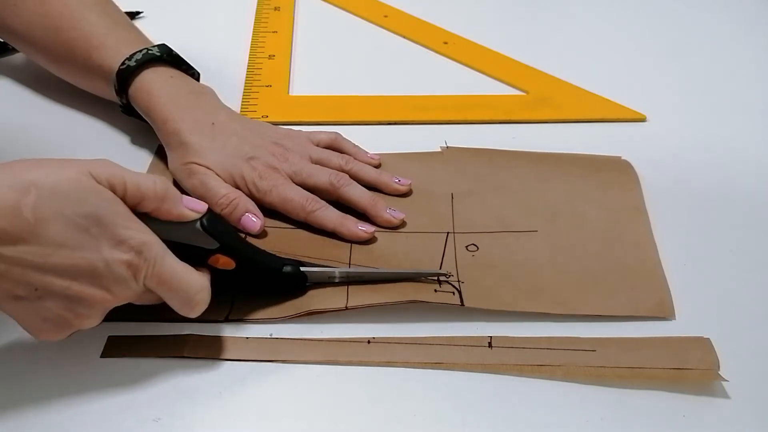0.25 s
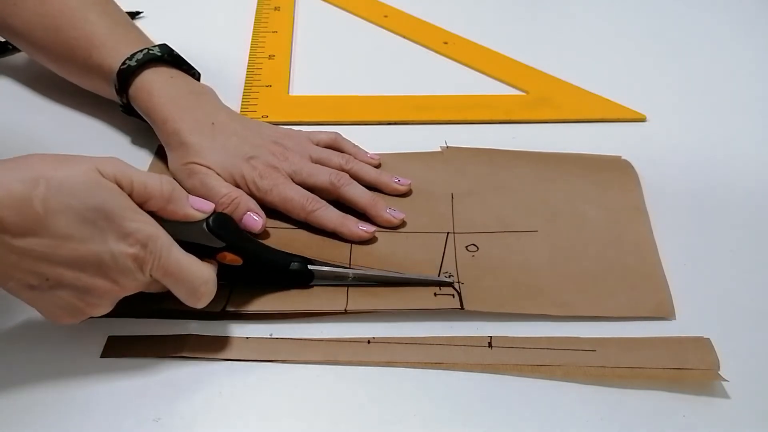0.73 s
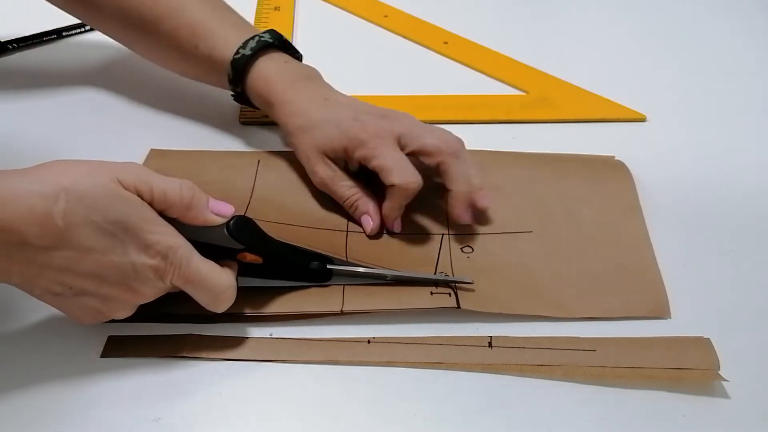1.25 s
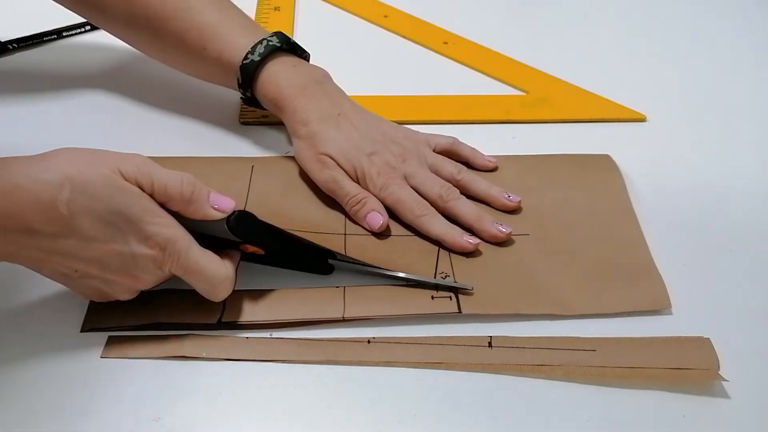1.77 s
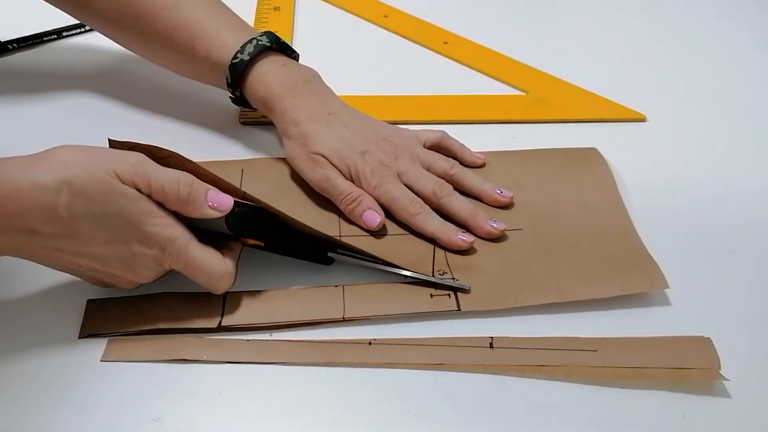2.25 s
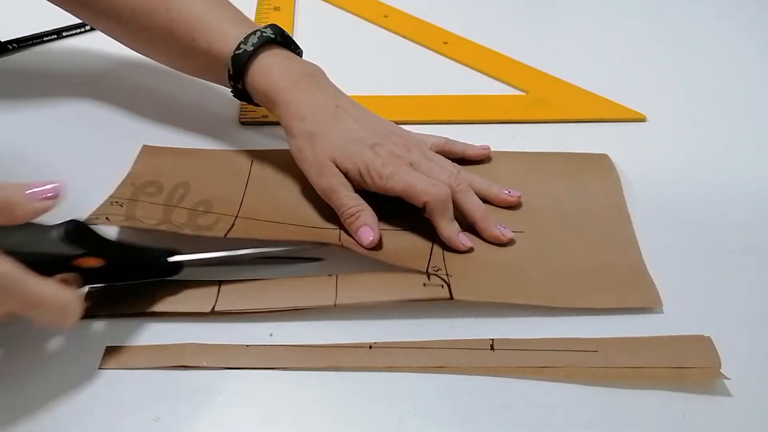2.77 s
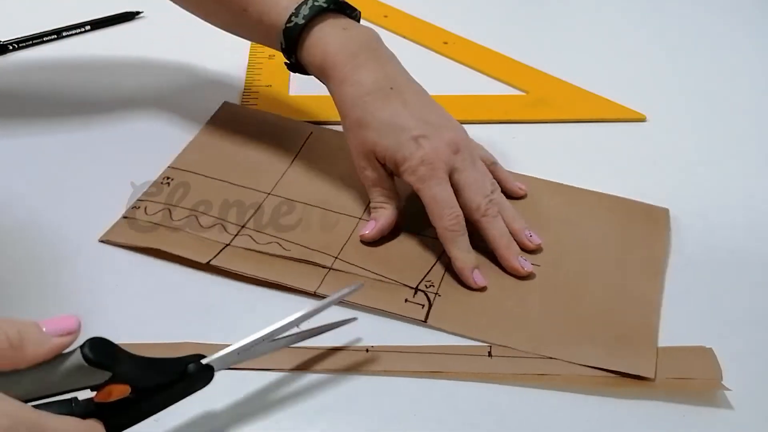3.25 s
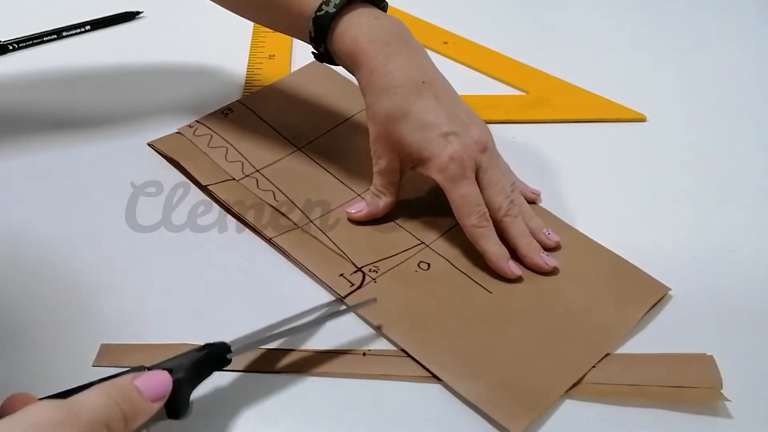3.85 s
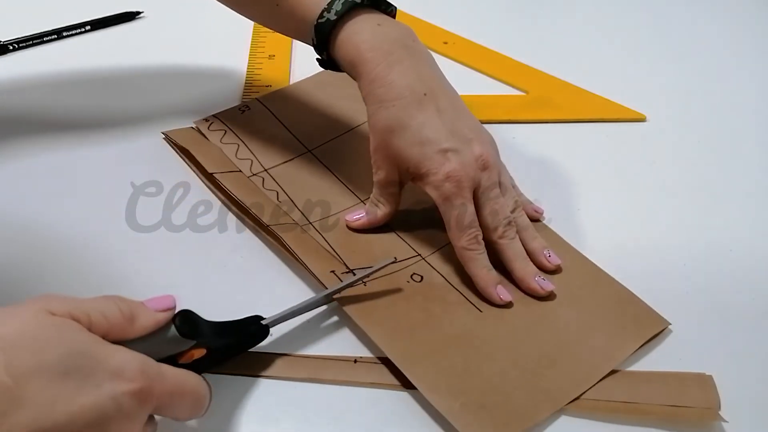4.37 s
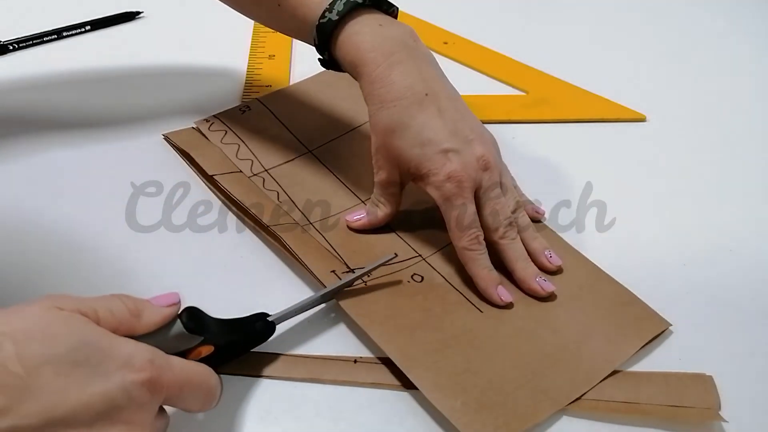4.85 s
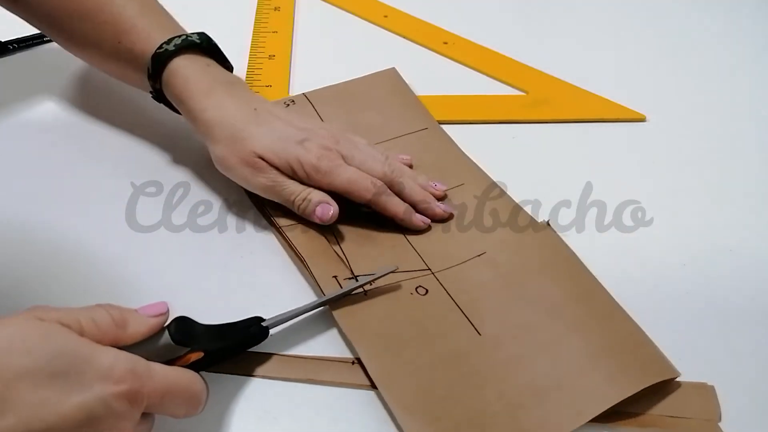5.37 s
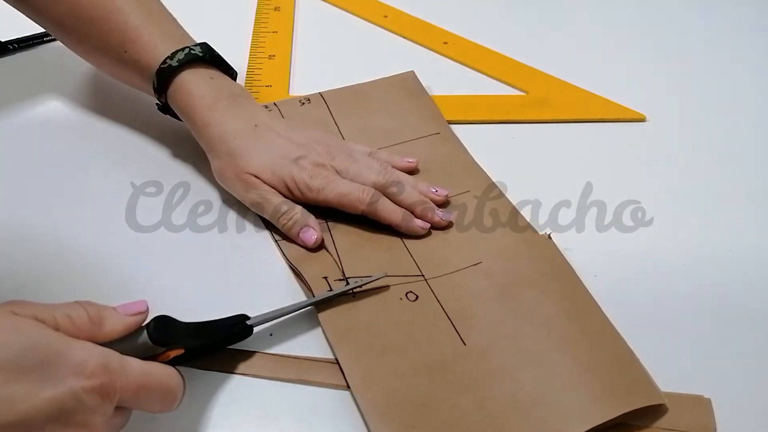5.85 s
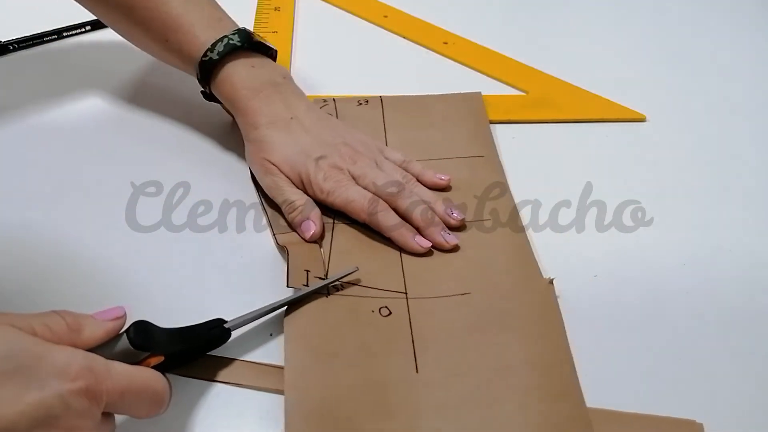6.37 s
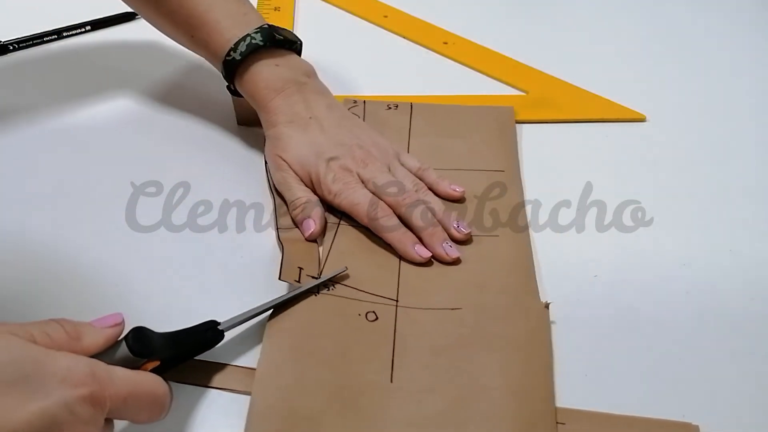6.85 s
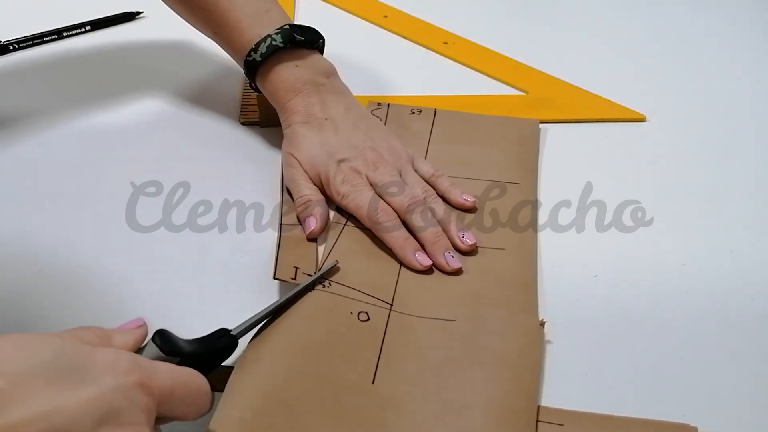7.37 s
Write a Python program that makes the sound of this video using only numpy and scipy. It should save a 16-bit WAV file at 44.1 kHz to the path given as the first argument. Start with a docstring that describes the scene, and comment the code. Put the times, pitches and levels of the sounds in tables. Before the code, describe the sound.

Heavy paper is cut on a table: fibrous, gritty crunches come first, loud and near, with low body and crisp edge. Blades and fingers then tap lightly while the sheet hisses and skin rubs dully. Steel raps the tabletop once with quick rebounds. Near-quiet follows, then a muffled hand thump, thin creaks, another brief cluster of snips and bright paper ticks. Dry small room, close microphone, soft air and rumble.

```python
"""Scissors bite through thick kraft paper on a table, close to the microphone in a small quiet room.
Fibres snap in clumps, the blades knock and strike the table once, and a few short bites follow late.
Hand and sheet rub in random slips, bent paper creaks and ticks through resonances, soft landings thump.
Table and scissors ring in their own modes; wall echoes, still air and a low rumble lie behind."""
import sys
import numpy as np
from scipy import signal
from scipy.io import wavfile
from scipy.ndimage import uniform_filter1d

SR = 44100
rng = np.random.default_rng(int(sys.argv[2]) if len(sys.argv) > 2 else 0)


def master_out(mix):
    """Clip the mix to full scale and print it as 16-bit PCM to the path in sys.argv[1]."""
    frames = np.transpose(np.atleast_2d(mix))
    ceiling = np.clip(frames, -1, 1)
    pcm = np.round(ceiling * 32767).astype(np.int16)
    wavfile.write(sys.argv[1], SR, pcm)


N = 335601

# spectrum of fine paper hiss: hz [Hz], density_db [dB per Hz, relative]
HISS_COLOUR = [(300, -30.5), (1500, -12), (2800, 3.5), (4000, 3.5), (5500, 6.5), (7200, 2)]
BAND_EDGE_HZ = 7520  # upper edge of the recorder's main band


def cutting():
    """Fibres snap in clumps as the blades close, with a low body and a brighter edge."""
    # closing blades: start_s [s], rise_s [s], fall_s [s], force_db [dB, relative], brightness_db [dB]
    strokes = [(0.048, 0.034, .15, -17, -5), (0.512, 0.018, 0.17, -20, -3),
               (0.674, 0.028, 0.049, -20.5, -2.5), (0.88, 0.03, 0.051, -27, -9.5),
               (0.925, 0.026, 0.046, -44, 14), (1.578, 0.021, 0.042, -31.5, -3),
               (1.637, 0.0031, 0.043, -23.5, 2.5), (1.7, 0.0035, 0.1, -32.5, 2.5),
               (1.882, 0.0022, 0.048, -30, 1), (2.129, 0.01, 0.031, -48, 18),
               (2.72, .015, 0.074, -41.5, 16.5)]
    # spectra of the low and the bright part: hz [Hz], density_db [dB per Hz, relative]
    cut_body = [(50, -49), (110, 8), (180, -9.5), (270, 7), (380, -7), (520, 4.5), (700, -4.5),
                (1000, -9.5), (1500, -18.5), (4000, -49)]
    cut_edge = [(300, -34), (900, -10), (1400, 10.5), (2000, 7.5), (2450, 3.5), (3200, -4.5), (4300, -8.5),
                (5500, -9), (7200, -20.5)]
    clumps = unit(uniform_filter1d(rng.standard_normal(N), size=260))
    snaps = unit(stick_slip(per_s=420, uneven=.7, size_db=4) * amp(2.5 * clumps))
    snaps = unit(snaps + 0.3 * grains(per_s=3000, spread_db=0))
    body = amp(-4.0) * colour(snaps, cut_body) * level(strokes)
    edge = amp(-7.5) * colour(snaps, cut_edge) * level(strokes, coloured=True)
    return body + edge


def biting():
    """Bundles of fibres give way under the blades; all ring the sheet at one pitch and crumble alike."""
    # bites: start_s [s], strength_db, body_db, edge_db [dB, relative]
    bites = [(0.064, -10, -21.5, -17.5), (0.073, -9, -26, -20), (0.086, -2.5, -27, -37),
             (0.103, -8.5, 0, -18), (0.128, -2.5, -36, -20.5), (0.149, -10.5, -14, -34.5),
             (0.472, -10, 5, -41), (0.483, -7, 0.5, -38), (0.492, -8.5, -1, -29),
             (0.515, -4.5, -8.5, -14.5), (0.537, -13, -18, -11), (0.545, -5, -3, -23), (0.57, -9, -16, -30),
             (0.572, 2, -26, -24), (0.578, -5, -8, -17), (0.614, -21, -16, -4.5), (0.68, -2.5, -9, -17.5),
             (0.694, -14, -22, -23), (0.716, -10, -8, -14), (6.596, -10, -13.5, -12.5),
             (6.603, -15, 7, -16), (6.646, -9, -16, -15.5)]
    pitch_hz, crumble_s = 566, .0036
    rows = [(s, db, pitch_hz, body, edge) for s, db, body, edge in bites]
    return amp(8.5) * blows(rows, crumble_s, crumble=3, ring_hz=650, clack_db=5, body_db=17.0, edge_db=15)


def knocking():
    """Blades, handles and fingers knock on each other, the sheet and the table."""
    # knocks: start_s [s], strength_db [dB, relative], pitch_hz [Hz], body_db, edge_db [dB, relative]
    knocks = [(0.107, -7, 2330, -5, -10), (0.214, -7, 1805, -9, -11), (0.405, -23, 2000, -37, -5.5),
              (1.009, -24.5, 504, -2, -23), (1.056, -26.5, 1785, -19, 2.5), (1.237, -20.5, 595, -36, -6),
              (1.641, -9.5, 511, 5.5, -26), (1.706, -12.5, 506, -7, -22), (1.889, -15, 535, 3.5, -5),
              (1.919, -19, 520, -10, -8.5), (2.13, -11.5, 2470, -16, -4.5), (2.139, -19, 2400, -30, -14),
              (2.263, -31.5, 2600, -9, -9), (2.344, -30.5, 1310, -21, -16), (2.39, -18.5, 650, -8, -7),
              (2.521, -11.5, 1540, -15, -5.5), (2.62, -26.5, 518, 8, -24), (2.872, -12, 3100, -16.5, -14),
              (3.758, -29.5, 2400, 0, -22), (5.031, -31, 509, -15, -30), (5.213, -16, 2700, -20, 8.5),
              (5.269, -18.5, 2730, -6, -4.5), (5.555, -31, 503, -10, -30), (5.832, -27, 966, -2, -23),
              (5.895, -26, 506, -5, -18), (6.101, -29.5, 576, 8, 1), (6.467, -29, 509, -26, -6),
              (6.644, -11, 2720, -2, -4.5)]
    crumble_s = .0027
    sound = blows(knocks, crumble_s, crumble=1.9, ring_hz=640, clack_db=-1.0, body_db=5.0, edge_db=3.5)
    return amp(11.0) * sound


def blows(rows, length, crumble, ring_hz, clack_db, body_db, edge_db, count=2500):
    """Each blow is a jolt and a short crumble: the sheet rings at its pitch, with body, clack and edge."""
    # spectra of the three added parts: hz [Hz], density_db [dB per Hz, relative]
    clack_colour = [(200, -26), (700, 2.5), (1300, 1.5), (1900, -3.5), (2500, 1.5), (3300, -10.5),
                    (5000, -28), (8000, -26)]
    body_colour = [(40, -35.5), (110, -0.5), (270, 2), (380, -10.5), (560, 3), (850, 1.5), (1300, -32.5),
                   (4000, -53.5)]
    edge_colour = [(800, -54), (2500, -29), (3500, 4), (5200, 8), (7200, 1)]
    out = np.zeros(N)
    age = np.arange(count) / SR / length
    for s, db, hz, body, edge in rows:
        crumbs = rng.standard_normal(count) * (rng.random(count) < .25)
        force = crumbs * np.sqrt(age) * np.exp(-age)
        force *= crumble / np.linalg.norm(force)  # size of the crumble against the jolt
        force[np.argmin(abs(age - .25))] += 1  # the jolt comes once the first fibres have gone
        sheet = resonate(resonate(force, hz, ring_hz), hz, 2 * ring_hz)
        parts = [(0, sheet),
                 (clack_db, colour(force, clack_colour)),
                 (body + body_db, colour(force, body_colour)),
                 (edge + edge_db, colour(force, edge_colour))]
        sound = sum(amp(part_db) * part / np.linalg.norm(part) for part_db, part in parts)
        add(out, s, amp(db) * sound / np.linalg.norm(sound))
    return out


def striking(count=2500):
    """The steel strikes the table and chatters: a hard contact and quick rebounds, each with some grit."""
    # contacts: start_s [s], level_db [dB, relative]
    contacts = [(3.4144, 1), (3.4161, 5), (3.4226, -8.5), (3.425, -7), (3.432, 0.5)]
    # spectrum of the strike: hz [Hz], density_db [dB per Hz, relative]
    strike_colour = [(50, -12), (120, 3.5), (290, 6), (400, -18.5), (560, 2.5), (750, 3), (1020, -8),
                     (1400, 4), (2500, -2.5), (3200, -11), (4150, -20), (4800, -8.5), (5600, -10.5),
                     (7300, -23)]
    force = np.zeros(N)
    t = np.arange(count) / SR
    for s, db in contacts:
        grit = 0.13 * rng.standard_normal(count) * np.exp(-t / 0.0019)
        add(force, s, -amp(db) * ((t == 0) + grit))
    return colour(force, strike_colour)


def sliding():
    """Paper slides over the table with a fine hiss; pressed down, it catches in coarser clumps."""
    # slides: start_s [s], rise_s [s], fall_s [s], speed_db [dB, relative], coarseness_db [dB]
    slides = [(0, 0.0027, 0.069, -50.5, 9), (0.05, .026, 0.15, -37.5, 16), (0.205, 0.014, 0.49, -50, 9),
              (0.826, .003, .03, -56, -5), (0.85, .08, .28, -51.5, 12), (1.17, .17, 0.11, -43.5, 7),
              (1.428, 0.032, 0.064, -35, 5.5), (2.105, 0.016, .06, -57.5, 16.5),
              (2.128, 0.013, 0.026, -35.5, 12.5), (2.39, 0.0053, 0.083, -54, 19),
              (2.45, 0.063, 0.41, -54, 14.5), (2.68, 0.1, 0.18, -37.5, 10), (2.868, 0.0055, .07, -31, 1),
              (2.966, 0.0082, 0.038, -50, 5), (3.02, 0.078, .15, -60.5, -17),
              (3.168, 0.015, 0.49, -54, -19), (3.46, 0.1, 0.24, -41.5, -3), (3.78, 0.16, .26, -47.5, 2.5),
              (4.655, .015, 0.05, -59, 8.5), (5.03, 0.16, .18, -44.5, 1), (5.255, 0.013, 0.14, -46, 8),
              (5.828, 0.0064, 0.037, -56, 18), (5.85, .048, 0.048, -51.5, 12.5),
              (5.999, 0.0072, 0.39, -53.5, 4.5), (6.097, 0.0035, 0.057, -45.5, 13),
              (6.13, 0.064, 0.52, -52.5, -0.5), (6.8, 0.11, 0.28, -58, 1.5), (7.09, 0.0056, 0.25, -56.5, 3),
              (7.3, 0.42, 0.2, -55, -8)]
    # spectrum of the coarse catches: hz [Hz], density_db [dB per Hz, relative]
    coarse_colour = [(150, -13), (600, -1.5), (1100, -4.5), (1800, -1), (2600, 1.5), (3500, -3),
                     (7000, -22)]
    fine = amp(4.5) * colour(grains(per_s=12000, spread_db=8.0), HISS_COLOUR) * level(slides)
    clumps = stick_slip(per_s=300, uneven=.8, size_db=3.5)
    catches = unit(grains(per_s=4000, spread_db=3) + .9 * clumps)
    return fine + amp(-2.5) * colour(catches, coarse_colour) * level(slides, coloured=True)


def dragging():
    """Skin sticks and slips on the sheet with a dull mutter; nails and steel add a harder rub."""
    # drags of hand and lower blade:
    # start_s [s], rise_s [s], fall_s [s], pressure_db [dB, relative], hardness_db [dB]
    drags = [(0.24, 0.072, 0.046, -37, -8), (1.19, 0.08, 0.084, -47, 6), (1.29, 0.085, 0.034, -54.5, -16),
             (1.44, 0.048, 0.047, -35.5, 2), (2.39, 0.022, 0.046, -42.5, -7), (2.615, 0.01, 0.17, -44, 2.5),
             (2.68, 0.093, 0.25, -49, -1), (4.94, 0.044, 0.11, -47, -17), (5.028, 0.024, 0.093, -37.5, -8),
             (5.55, 0.025, 0.26, -43, -2), (5.7, 0.034, 0.071, -51.5, -10),
             (5.825, 0.074, 0.042, -38, -4.5), (6.1, 0.031, 0.043, -37, -3.5),
             (6.46, 0.022, 0.087, -46, -9), (6.89, 0.018, 0.11, -48.5, 0), (6.95, 0.033, 0.041, -47, -17),
             (7.09, 0.029, 0.048, -39.5, -6)]
    # spectra of the dull and the hard rub: hz [Hz], density_db [dB per Hz, relative]
    soft_colour = [(50, -28.5), (110, -7), (165, 4.5), (240, 4.5), (310, -3), (400, -19), (900, -40.5)]
    hard_colour = [(280, -27.5), (420, -5), (520, 1.5), (680, -1), (900, -15.5), (1400, -12.5),
                   (3000, -30.5)]
    slips = grains(per_s=790, spread_db=3.0)
    soft = amp(-3) * colour(slips, soft_colour) * level(drags)
    hard = amp(-4.5) * colour(slips, hard_colour) * level(drags, coloured=True)
    return soft + hard


def creaking():
    """Paper rubs and bends on the flat steel: a stick-slip rasp whose pitch sinks as the sheet turns."""
    # creaks: start_s [s], rise_s [s], fall_s [s], strain_db [dB, relative], starting pitch_hz [Hz]
    creaks = [(0.214, 0.005, 0.027, -34, 1850), (0.241, 0.0068, .18, -50, 1950),
              (0.4, 0.017, 0.036, -33, 2005), (1.75, 0.068, 0.059, -40, 2100),
              (5.552, 0.0065, .1, -43, 2400), (5.64, 0.034, 0.19, -50.5, 2400),
              (6.12, .03, 0.22, -49, 2930), (6.299, 0.076, 0.097, -48.5, 2990),
              (6.461, 0.0036, .04, -46.5, 2520), (6.821, 0.095, 0.12, -43, 2940),
              (6.944, 0.011, 0.2, -38, 2800), (7.089, 0.0031, 0.2, -37.5, 2850),
              (7.181, 0.017, 0.047, -42, 2550), (7.22, 0.0037, 0.017, -29.5, 2600),
              (7.26, 0.058, 0.96, -48.5, 2340)]
    sag = .3  # octaves per second
    out = np.zeros(N)
    for s, rise, fall, db, hz in creaks:
        t = np.arange(0, rise + 2 * fall, 1 / SR)
        pitch = hz * 2 ** (-sag * t)
        slips = stick_slip(per_s=220, uneven=.6, size_db=5)[:len(t)]
        rasp = unit(resonate(resonate(slips, pitch, 850), pitch, 1500))
        hiss = amp(-27.5) * colour(slips, HISS_COLOUR)
        add(out, s, amp(db) * gesture(t, rise, fall) * (rasp + hiss))
    return amp(-6.0) * out


def ticking(count=900):
    """The bent sheet lets go in single sharp slips, each with a little grit behind it."""
    # ticks: start_s [s], strength_db [dB, relative], pitch_hz [Hz]
    ticks = [(1.8381, -24, 1820), (2.3809, -30, 1560), (5.162, -30, 2840), (5.3292, -29.5, 2520),
             (6, -29, 3500), (6.9473, -29.5, 3000), (6.9585, -31, 3060), (7.006, -30, 2840),
             (7.0932, -24, 2850), (7.107, -28, 2900), (7.1157, -38, 2960), (7.141, -29, 2240),
             (7.171, -28, 2210), (7.2222, -24, 2420), (7.337, -33.5, 3300), (7.3566, -27.5, 2520),
             (7.411, -33.5, 2440), (7.441, -28.5, 2400), (7.481, -30.5, 2220), (7.5288, -14, 3110),
             (7.5509, -23.5, 2570), (7.5597, -20.5, 3050), (7.5902, -32.5, 1870)]
    out = np.zeros(N)
    t = np.arange(count) / SR
    for s, db, hz in ticks:
        force = .16 * rng.standard_normal(count) * np.exp(-t / .0015) + (t == 0)
        tick = resonate(resonate(force, hz, 1500), hz, 2400) + 0.15 * colour(force, HISS_COLOUR)
        add(out, s, amp(db + 11) * tick / np.linalg.norm(tick))
    return out


def thumping(count=4000):
    """The hand lands softly and pushes the table through a swing or two."""
    # landings: start_s [s], level_db [dB, relative]
    thumps = [(1.24, -32), (1.318, -28.5), (1.476, -28), (1.509, -22), (1.726, -26), (2.409, -34),
              (3.419, -20.5), (5.277, -21.5), (5.299, -16.5), (6.616, -28.5)]
    out = np.zeros(N)
    t = np.arange(count) / SR
    swing = np.sin(2 * np.pi * 138 * t) * np.exp(-t / 0.008) * (1 - np.exp(-t / 0.001))
    for s, db in thumps:
        add(out, s, amp(db) * swing)
    return out


def room(x, count=1200, size=22):
    """Quick reflections from nearby, then dense wall echoes that die band by band."""
    # decay of the wall echoes: hz [Hz], t60_s [s]
    decay = [(100, 0.53), (260, 0.34), (700, 0.24), (1800, 0.3), (4800, 0.2), (7500, 0.23)]
    # first echoes off the table and the arms: delay_s [s], gain [linear, signed]
    early = [(.0008, -0.081), (.0021, 0.12), (.0034, 0.18), (.0075, 0.022)]
    taps = np.zeros(count * size)
    taps[np.arange(count) * size + rng.integers(0, size, count)] = rng.choice([-1., 1.], count)
    hz, t, bands = signal.stft(taps, SR, nperseg=256)
    fading = bands * amp(-60 * t / read(decay, hz)[:, None])
    tail = signal.istft(fading, SR, nperseg=256)[1]
    echoes = signal.fftconvolve(x, tail / np.linalg.norm(tail))[:N]
    out = 1.146 * x  # the direct sound
    for delay, gain in early:
        add(out, delay, gain * x)
    add(out, .005, amp(-4.5) * echoes)
    return out


def ambience():
    """Still room air, as coloured noise, over a low resonant rumble of wavering level."""
    # spectrum of the air: hz [Hz], density_db [dB per Hz, relative]
    air_colour = [(12, -25), (20, 5), (43, -4.5), (74, 1), (156, -11), (297, -13), (380, -19), (499, -14.5),
                  (1280, -18.5), (2040, -24), (3790, -25), (5640, -30.5), (7400, -38), (9620, -59),
                  (16300, -120)]
    # level of the rumble over time: time_s [s], level_db [dB rms]
    rumble_level = [(0, -52.5), (.9, -51), (1.5, -62), (2.5, -62), (2.9, -54.5), (3.7, -56), (4.2, -52),
                    (4.8, -50.5), (5.4, -47), (6.2, -68), (6.7, -50.5), (7.6, -69)]
    air = amp(-54) * unit(band_limit(colour(rng.standard_normal(N), air_colour, size=16384)))
    rumble = unit(resonate(resonate(rng.standard_normal(N), 67.7, 28), 63, 33))
    return air + rumble * amp(np.interp(np.arange(N) / SR, *np.transpose(rumble_level)))


def ring(x, modes):
    """What a body with these modes gives back when shaken by x: a sum of dying sines."""
    t = np.arange(SR // 2) / SR
    taps = sum(amp(db - 60 * t / t60) * np.sin(2 * np.pi * hz * t) / t60 for hz, db, t60 in modes)
    return signal.fftconvolve(x, taps * 2 * np.log(1000) / SR)[:N]


def stick_slip(per_s, uneven, size_db, count=8000):
    """Load builds and lets go at uneven gaps, 1/per_s at the median: clicks of uneven size, rms 1."""
    wait, size, side = rng.standard_normal((count, 3)).T
    at = (np.cumsum(np.exp(uneven * wait)) * SR / per_s).astype(int)
    clicks = np.sign(side) * amp(size_db * np.clip(size, -2, 2))
    out = np.zeros(N)
    out[at[at < N]] = clicks[at < N]
    return unit(out)


def grains(per_s, spread_db):
    """Random tiny slips of uneven size, rms 1."""
    size = amp(spread_db * np.minimum(rng.exponential(1, N), 3))
    return unit(size * rng.choice([-1, 1], N) * (rng.random(N) < per_s / SR))


def gesture(t, rise, fall):
    """Gain of one rubbing gesture at age t: contact, a swell to the peak, then the release."""
    swell_db = -12 * np.maximum(1 - t / rise, 0)
    release_db = -22 * (np.maximum(t - rise, 0) / fall) ** 1.29  # 22 dB down after the fall time
    contact = np.minimum(t / (0.19 * rise), 1)  # eases in over a share of the rise
    return contact * amp(swell_db + release_db)


def level(rows, coloured=False):
    """Gain over time of a table of gestures; coloured adds each one's last column, in dB."""
    out = np.zeros(N)
    for s, rise, fall, db, colour_db in rows:
        t = np.arange(0, rise + 2 * fall, 1 / SR)
        add(out, s, amp(db + coloured * colour_db) * gesture(t, rise, fall))
    return out


def resonate(x, hz, width):
    """A resonance, about gain 1 at its peak, whose pitch may follow a curve; hz and width in Hz."""
    turn = np.exp(2j * np.pi * np.cumsum(hz * np.ones(len(x))) / SR)
    r = np.exp(-np.pi * width / SR)
    # shift the pitch down to 0 Hz, smooth there, shift back up
    return 2 * (turn * signal.lfilter([1 - r], [1, -r], x / turn + 1e-18)).real


def colour(x, points, size=4096):
    """Causal minimum-phase filter with the given spectrum and energy 1."""
    log_gain = np.log(amp(read(points, abs(np.fft.fftfreq(size, 1 / SR)))))
    taps = np.fft.ifft(np.exp(np.conj(signal.hilbert(log_gain)))).real[:size // 2]
    return signal.fftconvolve(x, taps / np.linalg.norm(taps))[:len(x)]


def band_limit(x):
    """Steep low-pass at the upper edge of the recorder's main band."""
    taps = signal.firwin(401, BAND_EDGE_HZ, window=("kaiser", 7), fs=SR)
    return signal.fftconvolve(x, taps, "same")


def read(points, hz):
    """Reads a table of (Hz, value) on a log-frequency axis."""
    f, value = np.transpose(points)
    return np.interp(np.log(hz + 1), np.log(f + 1), value)


def add(mix, s, sound):
    """Mixes a sound in at a time in seconds."""
    part = mix[max(round(s * SR), 0):][:len(sound)]
    part += sound[:len(part)]


def amp(db):
    """Decibels to gain."""
    return 10 ** (np.asarray(db) / 20)


def unit(x):
    """Scales to rms 1."""
    return x / np.sqrt(np.mean(x ** 2) + 1e-20)


def scene():
    """Contacts shake table and scissors; everything but the ambience sounds into the room."""
    # modes of the table top and of the scissors: hz [Hz], level_db [dB, relative], t60_s [s]
    table_modes = [(106, -9.5, 0.57), (167, -12.5, .3), (221, 5, 0.45), (280, -18, 0.76), (335, -3.5, 0.22),
                   (444, -14, 0.42), (509, -16.5, 0.54), (584, -12.5, 0.56), (699.5, 6, 0.081),
                   (871, -6.5, 0.078), (1000, 4, 0.14)]
    scissor_modes = [(1445, -3, .13), (1712, -4, .13), (1822, -2, .14), (1911, -4, .15), (2200, -4, .14),
                     (2378, -1, .14), (2622, -5, .14), (3260, -7, .14), (3553, -9, .14)]
    blades = biting() + knocking() + cutting() + striking()
    contact = blades + dragging() + thumping()
    solid = contact + amp(-11.5) * ring(contact, table_modes) + amp(-11) * ring(blades, scissor_modes)
    paper = amp(-4.0) * sliding() + creaking() + ticking()
    return (room(solid + paper) + ambience())[None]


def record(dry):
    """A narrow-band recorder rounds off the highest peaks; a trace and faint hiss pass its band edge."""
    ceiling = .62  # peak level at which the recorder saturates
    inside = band_limit(dry[0])
    rounded = inside / (1 + (inside / ceiling) ** 4) ** .25
    trace = amp(-37.5) * dry[0]
    hiss = amp(-83.5) * rng.standard_normal(N)
    out = band_limit(rounded) + trace + hiss
    top = signal.firwin(401, 15700, window=("kaiser", 8), fs=SR)  # final low-pass, Hz
    return signal.fftconvolve(out, top, "same")[None]


dry = scene()
out = record(dry)
master_out(out)
```